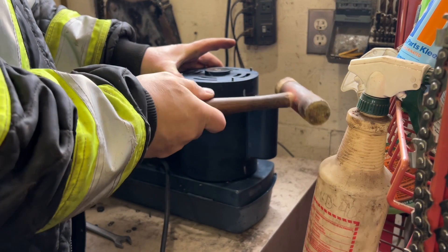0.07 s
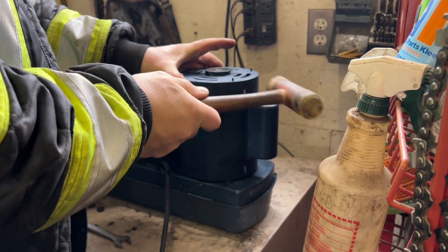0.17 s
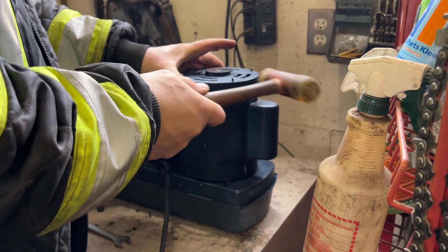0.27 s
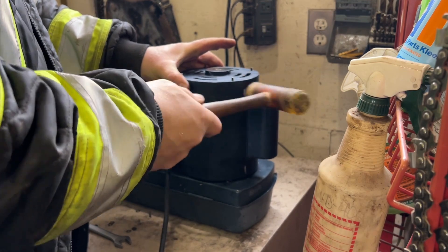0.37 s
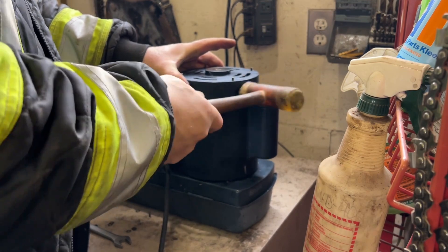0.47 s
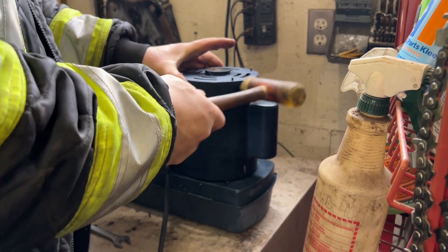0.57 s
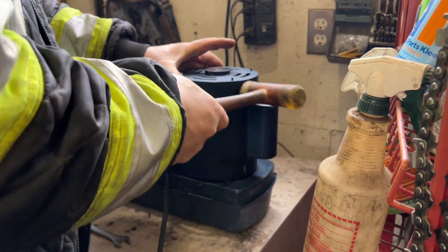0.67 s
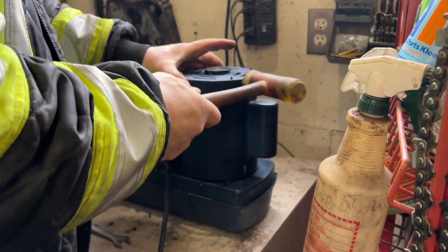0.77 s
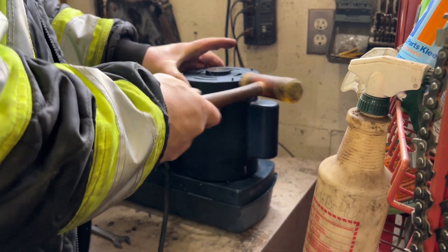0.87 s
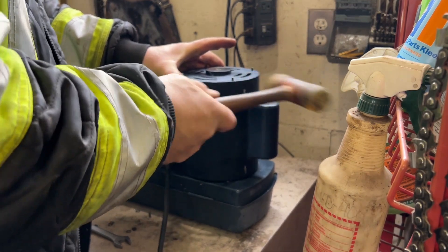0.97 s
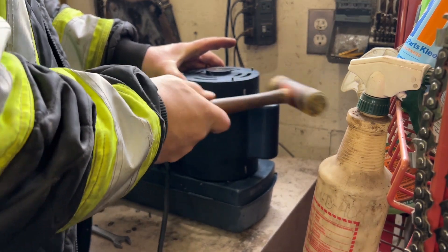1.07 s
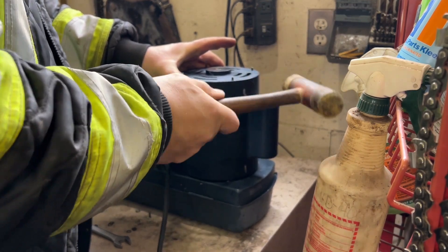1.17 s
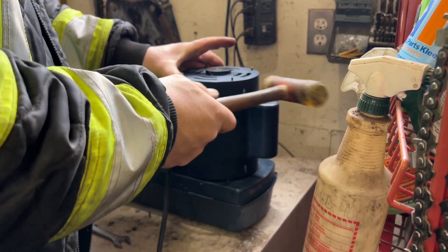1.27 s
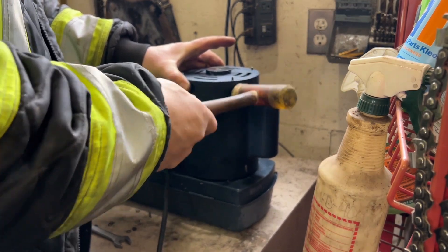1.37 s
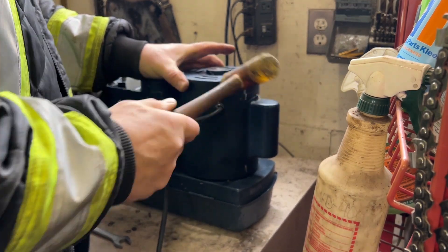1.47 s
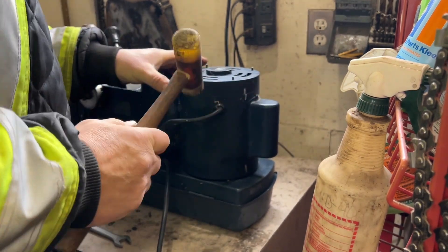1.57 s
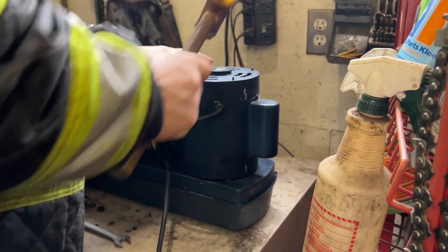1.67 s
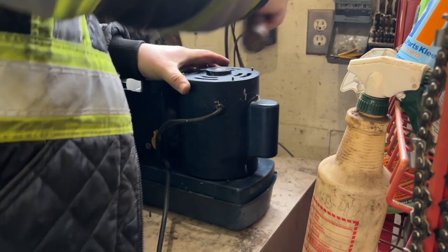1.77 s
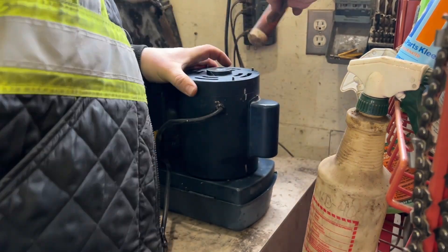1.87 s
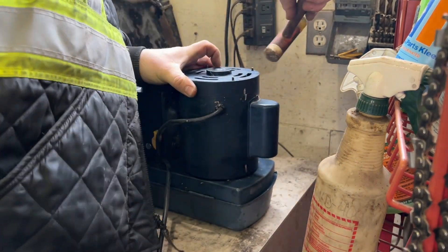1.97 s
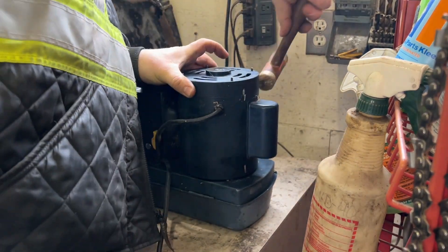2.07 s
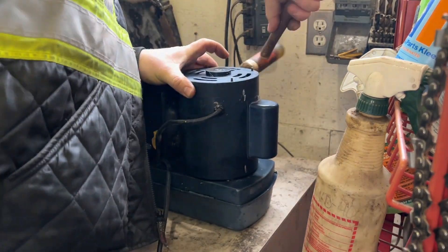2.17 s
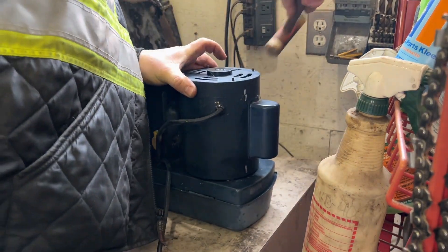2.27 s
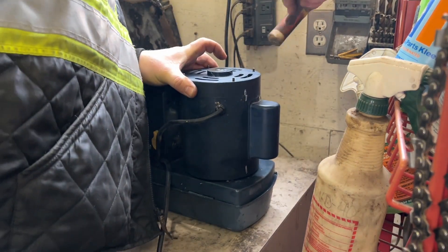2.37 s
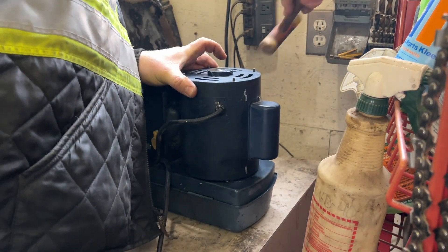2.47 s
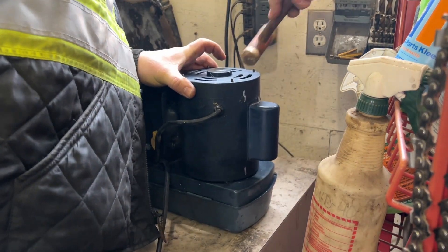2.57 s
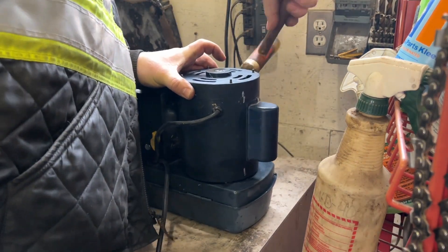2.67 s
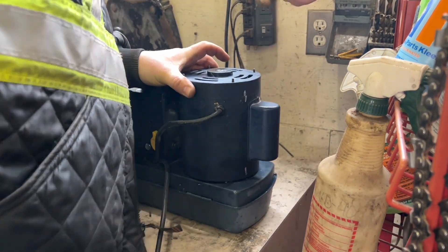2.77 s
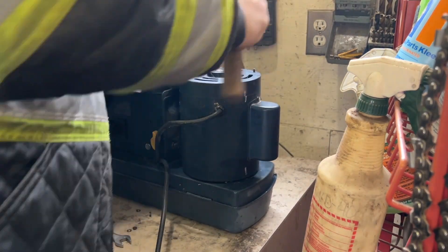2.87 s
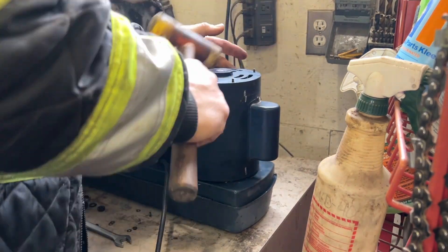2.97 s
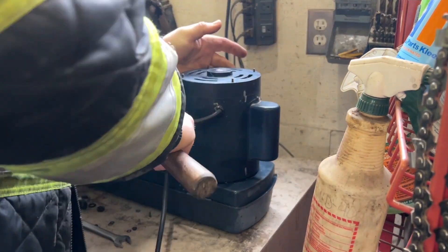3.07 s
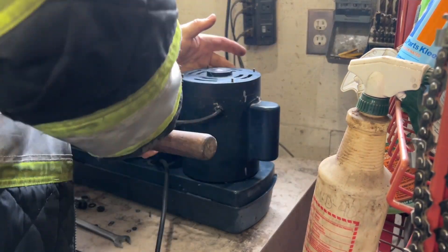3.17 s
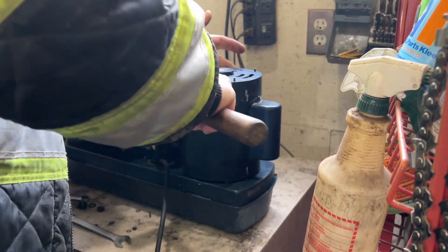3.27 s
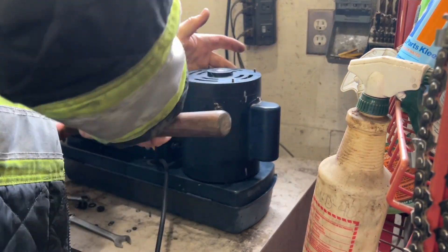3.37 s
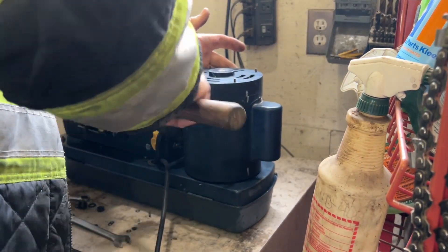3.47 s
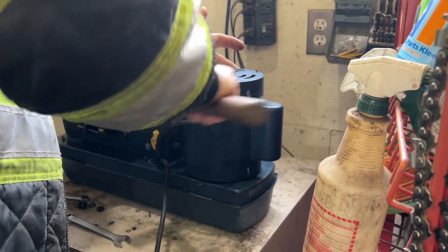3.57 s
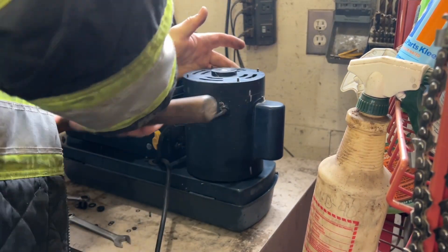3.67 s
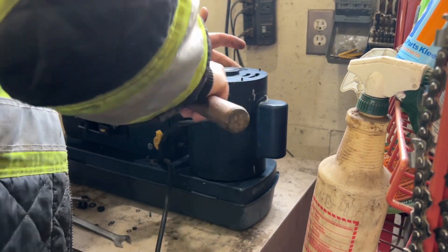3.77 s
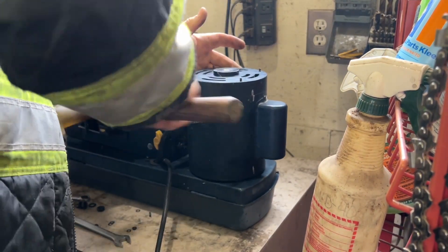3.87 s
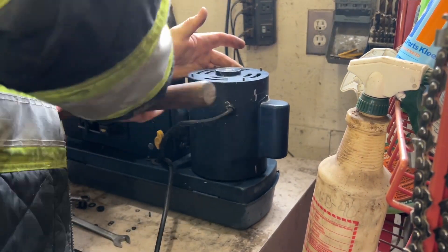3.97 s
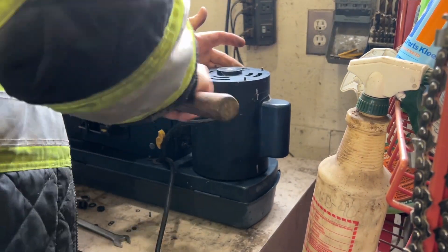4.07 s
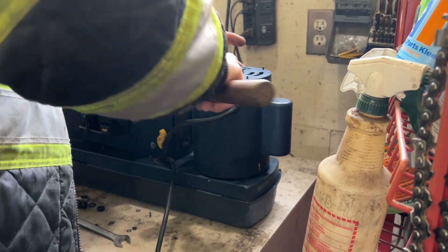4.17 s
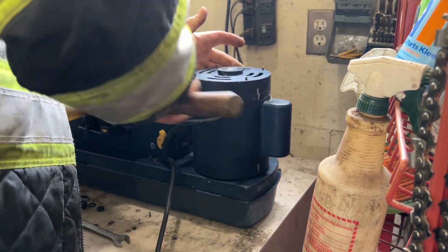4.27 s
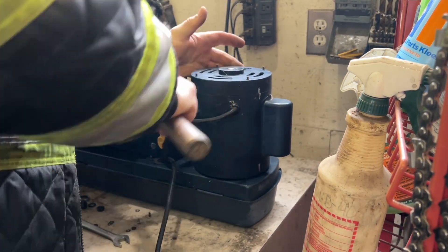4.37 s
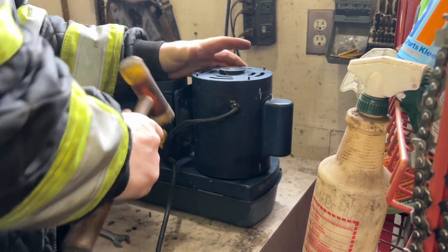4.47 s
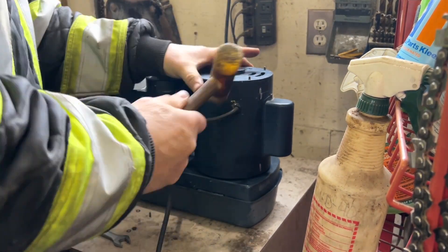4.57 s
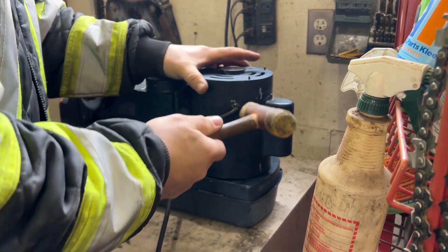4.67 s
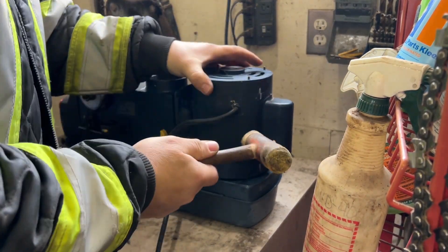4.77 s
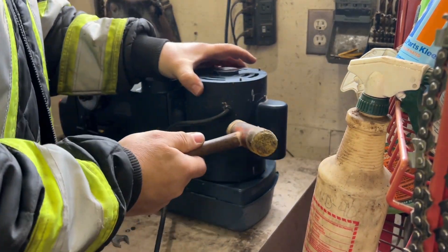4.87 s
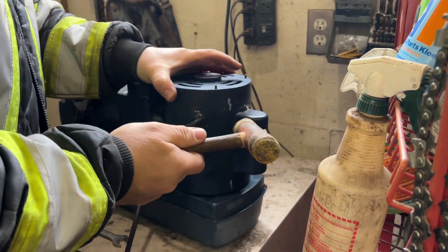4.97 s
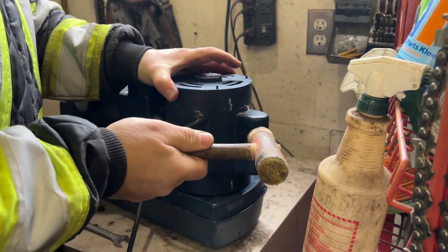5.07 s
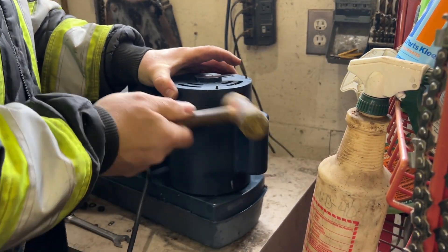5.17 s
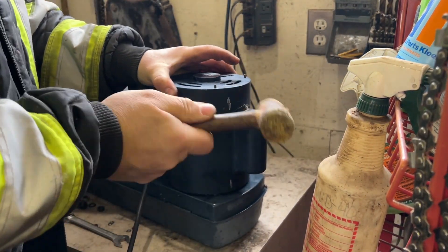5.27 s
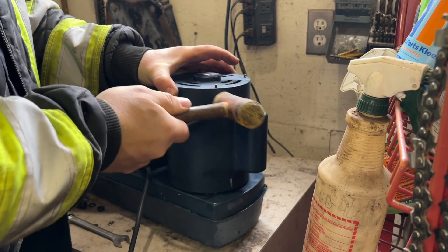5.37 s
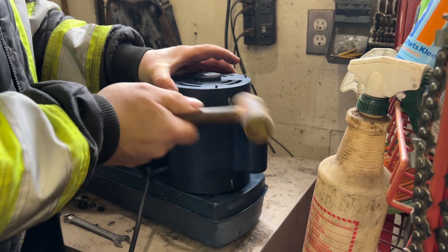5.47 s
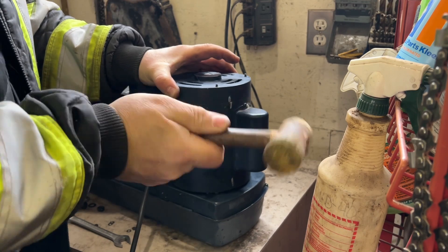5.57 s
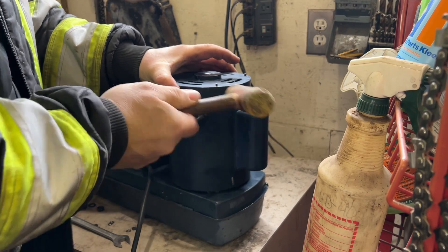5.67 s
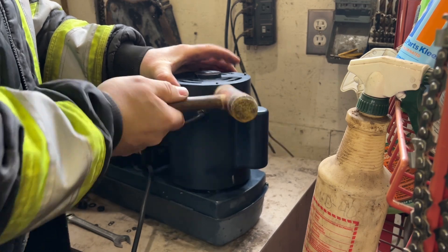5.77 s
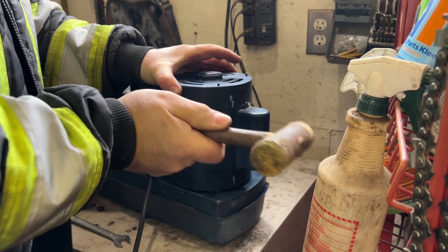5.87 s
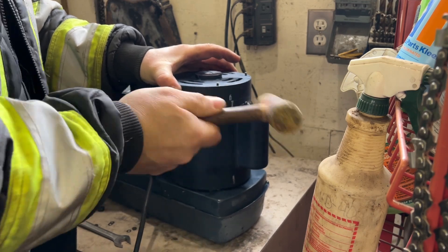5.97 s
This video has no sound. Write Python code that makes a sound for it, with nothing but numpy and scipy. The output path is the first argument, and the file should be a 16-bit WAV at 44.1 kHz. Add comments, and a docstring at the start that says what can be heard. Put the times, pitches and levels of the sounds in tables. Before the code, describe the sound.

Four runs of loud, dry mallet blows on a metal motor casing, recorded close on a workbench in a small, briefly reverberant room. The first run is fastest, the second quieter and clickier, the third and fourth slower and forceful. Loose parts tick and a cover chatters among the blows. In the gaps, a thin beating metallic tone fades, a jacket rustles, and the motor's base grates shortly over its tray. Very quiet room air lies beneath.

```python
"""A workshop bench in a small shop: a mallet taps a steel motor housing in four runs, each at a new spot.
A blow is a noise crack, decaying sine modes of casing and bench, dense noise clatter and the shop's answer.
A faint beating pair of modes sings on in the pauses; loose parts tick as short rings and clicks, a cover
chatters, grainy noise makes a jacket rustle and the motor's base drag on its tray, over quiet shop air."""
import sys
import numpy as np
from scipy import signal
from scipy.fft import rfft, irfft, next_fast_len
from scipy.io import wavfile
from scipy.ndimage import uniform_filter1d

SR = 44100
rng = np.random.default_rng(int(sys.argv[2]) if len(sys.argv) > 2 else 0)


def convert_level_to_amplitude(level_db):
    """Map a level in decibels to its linear amplitude factor."""
    exponent = np.asarray(level_db, float) / 20
    return 10 ** exponent


def wav_out(sig):
    """Save sig, one row per channel (or a flat mono array), as 16-bit PCM at SR to the path in sys.argv[1]."""
    wavfile.write(sys.argv[1], SR, np.round(np.clip(np.atleast_2d(sig).T, -1, 1) * 32767).astype(np.int16))


N = 266055  # length [samples]

# Mallet blows: (time [s], level [dB], casing boost [dB], crack boost [dB], long tone left behind [dB])
MALLET_BLOWS = [(0.0089, -2.5, 1, -0.5, -26.5), (0.1189, -2, 3.5, -3.5, -34.5),
                (0.2285, -3.5, 1.5, 1.5, -34.5), (0.3431, -2.5, 2.5, -3.5, -34.5),
                (0.4528, -3.5, 0, 0, -41.5), (0.5559, -2.5, 1.5, -2.5, -44.5),
                (0.6666, -5, 2.5, -0.5, -53.5), (0.7818, -5, 2.5, 3.5, -53.5), (0.8896, -5.5, 1.5, 3, -46),
                (0.9998, -4, 1, 3.5, -58), (1.1029, -2, -0.5, -4, -37), (1.2184, -2.5, -2, 0.5, -50),
                (1.339, -3, 1.5, 1, -45), (2.0596, -10, 0.5, 3.5, -61), (2.1878, -10, 1, 9.5, -44.5),
                (2.3099, -9, 3.5, 6, -44), (2.4278, -8, 4.5, 5.5, -46.5), (2.5447, -9, 6, 4, -42.5),
                (2.6627, -8.5, 4.5, 1, -44.5), (3.2787, -2.5, 1, 2, -39), (3.4349, -2.5, 0.5, -2, -37.5),
                (3.5883, -3, -1.5, -7.5, -45), (3.754, -2, -2, -4, -43), (3.908, -2, 2, 0.5, -34),
                (4.0457, -3.5, 0.5, -3, -44), (4.1795, -4, 0.5, -4.5, -47.5), (4.3076, -3.5, 2.5, -1, -42),
                (5.1997, -7, 4, 5.5, -58), (5.355, -3.5, 0, 1.5, -54), (5.501, -2.5, -3.5, -5, -48.5),
                (5.6467, -2.5, -2.5, -4.5, -49.5), (5.786, -3.5, -2.5, -5.5, -56),
                (5.9247, -3, -2, -3.5, -44)]


def unit(x):
    """Scales to rms 1."""
    return x / np.sqrt(np.mean(x ** 2) + 1e-20)


def along(points, hz):
    """Reads a curve of (frequency [Hz], value) points on a log frequency axis."""
    f, value = np.transpose(points)
    return np.interp(np.log(hz + 1), np.log(f + 1), value)


def level(rows):
    """Gain per sample from (time [s], level [dB]) rows, practically silent outside them."""
    s, db = np.transpose(rows)
    return convert_level_to_amplitude(np.interp(np.arange(N) / SR, s, db, left=-150, right=-150))


def filtered(x, response):
    """Multiplies the spectrum of x by a complex response of frequency."""
    size = next_fast_len(x.shape[-1] + 8192)  # padding gives the filter's tail room
    spectrum = rfft(x, size) * response(np.fft.rfftfreq(size, 1 / SR))
    return irfft(spectrum, size)[..., :x.shape[-1]]


def stereo(pair, spectrum, wide):
    """Colours two unrelated signals and mixes them to left and right; wide scales their unlikeness."""
    # How alike left and right are before widening: (frequency [Hz], likeness [0-1])
    likeness = [(60, 1), (180, 0.98), (550, 0.9), (1650, 0.41), (4970, 0.5), (15000, 0.61)]

    def mid_and_side(hz):
        turn = wide * np.arccos(np.clip(along(likeness, hz), -1, 1)) / 2
        return convert_level_to_amplitude(along(spectrum, hz)) * np.array([np.cos(turn), np.sin(turn)])[:, None]

    mid, side = filtered(pair, mid_and_side)
    return np.array([mid + side, mid - side])


def alike_noise(spot, size, same):
    """Two noise rows per blow; blows at one spot have the share `same` of their noise power in common."""
    same = np.clip(same, 0, 1)
    shared = rng.standard_normal((2, spot.max() + 1, size))[:, spot]
    own = rng.standard_normal((2, len(spot), size))
    return np.sqrt(same) * shared + np.sqrt(1 - same) * own


def dying(noise, t60, rise_cycles):
    """Each octave band builds up over a few of its cycles, then dies at its own speed."""
    t = np.arange(noise.shape[-1]) / SR
    edges = 45 * 2.0 ** np.arange(10)
    out = 0
    for lo, hi in zip(edges, edges[1:]):
        mid_hz = np.sqrt(lo * hi)
        band = filtered(noise, lambda hz: (hz >= lo) & (hz < hi))
        fade = convert_level_to_amplitude(-60 * t / along(t60, mid_hz))
        rise = (1 - np.exp(-t * mid_hz / rise_cycles)) ** 2
        out = out + band * fade * rise
    return out


def struck_spot(s):
    """A pause over 0.3 s means the mallet has moved on to the next spot."""
    return np.cumsum(np.diff(s, prepend=0) > 0.3)


def shop_air():
    """The shop's steady background: coloured stereo noise."""
    # Colour of the background: (frequency [Hz], relative density [dB])
    air_colour = [(30, -31), (70, -5), (130, -2.5), (300, -17.5), (600, -9), (1200, -18), (3000, -21.5),
                  (16000, -33)]
    return convert_level_to_amplitude(-64) * unit(stereo(rng.standard_normal((2, 1, N)), air_colour, wide=0.53)[:, 0])


def jacket():
    """Quilted cloth rustles in uneven grains as the arms move; each rustle swells and sinks."""
    # Rustles: (peak time [s], relative level [dB], rise over 20 dB [s], fall over 20 dB [s])
    rustles = [(1.54, -74.5, .2, 0.067), (1.655, -59, 0.13, .09), (1.84, -71.5, .25, .25),
               (2.8, -73.5, 0.14, .35), (3.045, -60, .14, .1), (4.535, -57.5, 0.088, .08),
               (4.955, -53, .12, 0.081), (5.145, -61.5, 0.02, .04)]
    # Colour of the cloth: (frequency [Hz], relative density [dB])
    cloth_colour = [(150, -7), (500, 0), (1000, -0.5), (2000, -5), (3500, -7.5), (5000, -6), (8000, -5),
                    (12000, -5.5), (16000, -16.5)]
    t = np.arange(N) / SR
    grain_db = 2.5 * unit(uniform_filter1d(rng.standard_normal(N), size=60))
    grains = rng.standard_normal((2, 1, N)) * convert_level_to_amplitude(grain_db)
    swell = 0
    for s, db, rise, fall in rustles:
        distance = np.abs((t - s) / np.where(t < s, rise, fall))
        swell = swell + convert_level_to_amplitude(db - 20 * distance ** 1.15)
    return convert_level_to_amplitude(6.5) * swell * unit(stereo(grains, cloth_colour, wide=1.2)[:, 0])


def drag():
    """The motor's base slides in rough slips that sound through the tray's resonances."""
    # Loudness of the slide: (time [s], level [dB])
    slide_level = [(4.82, -83), (4.866, -53), (4.97, -38), (5.014, -49), (5.048, -61), (5.054, -52),
                   (5.1, -63.5)]
    # Tray resonances: (frequency [Hz], width [Hz], relative level [dB])
    tray_modes = [(570, 38, 0), (970, 160, -6.5), (1180, 48, -9), (1790, 70, -11)]
    broad_colour = [(100, -18.5), (300, -13), (800, -15.5), (1500, -17.5), (3000, -29), (8000, -45)]  # Hz, dB
    slip_db = 5.9 * unit(uniform_filter1d(rng.standard_normal(N), size=200))
    slips = rng.standard_normal(N) * convert_level_to_amplitude(slip_db)

    def tray(f):
        response = convert_level_to_amplitude(along(broad_colour, f))
        for k, (hz, width, db) in enumerate(tray_modes):
            resonance = 1j * f * width / (hz * hz - f * f + 1j * f * width)
            response = response + (-1) ** k * convert_level_to_amplitude(db) * resonance  # neighbours in opposite polarity
        return response

    return level(slide_level) * unit(filtered(slips, tray))


def ticks():
    """Loose parts tick: a short noise click and a mix of the small modes nearest to each tick's colour."""
    # Ticks: (time [s], level [dB], centre of the colour [Hz], share of the modes' t60 [ratio])
    tick_rows = [(1.603, -53, 2690, 1), (1.721, -52, 2930, 1.1), (1.745, -46.5, 3730, 0.45),
                 (1.818, -64, 2750, 0.94), (1.917, -49, 4600, .7), (2.993, -57.5, 4600, 0.69),
                 (3.543, -38, 5500, 0.45), (3.677, -36.5, 7500, 0.34), (3.7, -30, 6800, 0.21),
                 (3.717, -38.5, 7800, 0.24), (3.839, -35.5, 7500, 0.5), (3.862, -37, 7500, .6),
                 (3.884, -41, 7500, 0.67), (4.649, -61, 4040, 0.87), (4.666, -49.5, 2050, 0.84),
                 (4.717, -63, 6050, 0.54), (4.761, -50.5, 3020, 0.71), (4.783, -64.5, 2450, 0.71),
                 (4.817, -64.5, 4000, 0.46), (4.838, -71, 5030, .4), (4.969, -40.5, 8000, 0.43),
                 (5.031, -62, 4000, 0.32), (5.141, -52.5, 3780, 1.1)]
    # Modes of the loose parts: (frequency [Hz], relative level [dB], full t60 [s])
    part_modes = [(2017, -4, 0.06), (2450, -12.5, 0.068), (2750, -6.5, 0.13), (3550, -5, 0.045),
                  (4600, 1, 0.032), (5930, -9.5, 0.045), (7500, -2.5, 0.021), (8190, -3, 0.03),
                  (10400, -1, .02)]
    out = np.zeros(N + SR)
    t = np.arange(SR // 10) / SR
    hz, mode_db, t60 = np.transpose(part_modes)[..., None]
    for s, db, centre_hz, share in tick_rows:
        off_colour_db = 11 * np.abs(np.log2(hz / centre_hz))
        strength_db = mode_db - off_colour_db + rng.normal(0, 2.1, hz.shape)
        ring = np.sum(convert_level_to_amplitude(strength_db - 60 * t / t60 / share) * np.sin(2 * np.pi * hz * t), axis=0)
        colour = lambda f: convert_level_to_amplitude(-14 * np.abs(np.log2((f + 1) / centre_hz)))
        near = unit(filtered(rng.standard_normal(len(t)), colour))
        click = 0.35 * convert_level_to_amplitude(-60 * t / 0.052 / share) * near
        out[round(s * SR):][:len(t)] += convert_level_to_amplitude(db) * (ring + click)
    return out[:N]


def cover():
    """A loose cover chatters in soft short knocks, each sounding its close modes in a new mix."""
    # Knocks: (time [s], level [dB])
    knocks = [(0.029, -19), (2.689, -23.5), (2.70, -36), (3.464, -21), (3.495, -34), (3.518, -40),
              (3.538, -41), (3.672, -33), (3.697, -39), (3.806, -37), (3.842, -37), (3.86, -39),
              (3.882, -41), (3.934, -20), (3.955, -24), (4.336, -21), (4.36, -37)]
    # The cover's close modes: frequency [Hz]
    cover_modes = [982, 1054, 1100]
    out = np.zeros(N + SR)
    t = np.arange(SR // 10) / SR
    for s, db in knocks:
        ring = 0
        for hz in cover_modes:
            phase = rng.uniform(0, 2 * np.pi)
            ring = ring + convert_level_to_amplitude(rng.normal(-2, 3)) * np.sin(2 * np.pi * hz * t + phase)
        envelope = convert_level_to_amplitude(db - 60 * t / 0.043) * (1 - np.exp(-t / 0.002))
        out[round(s * SR):][:len(t)] += envelope * ring
    return out[:N]


def singing(blows):
    """Each blow leaves the pair at a new strength; it is damped while the blow is loud, then beats and fades."""
    # Pair at each spot: (frequency [Hz], partner's offset [Hz], partner [dB], first dip after the blow [s])
    pair_by_spot = [(696, -7.5, -2, -.005), (679, 7, -0.5, 0.072), (666, 5.5, -2, 0.11),
                    (680, 8.5, -3, .05)]
    t60 = 1.83  # s
    s, sing_db = np.transpose(MALLET_BLOWS)[[0, 4]]
    t = np.arange(N) / SR
    last = np.maximum(np.searchsorted(s, t) - 1, 0)  # the latest blow at each sample
    since = t - s[last]
    hz, offset_hz, partner_db, dip_s = np.transpose(pair_by_spot)[:, struck_spot(s)[last]]
    pair = 1 - convert_level_to_amplitude(partner_db) * np.exp(2j * np.pi * offset_hz * (since - dip_s))
    for neighbour_db, neighbour_hz in [(-13.5, 13.5), (-11, 26.5)]:  # fainter neighbours roughen it
        pair = pair + convert_level_to_amplitude(neighbour_db) * np.exp(2j * np.pi * neighbour_hz * t)
    wander = np.cumsum(rng.normal(0, 0.003, N))  # slow phase drift
    tone = (pair * np.exp(2j * np.pi * hz * t + 1j * wander)).imag
    loud = np.abs(uniform_filter1d(blows[0] ** 2, size=900, origin=440))
    damping = 1 + loud / convert_level_to_amplitude(-75.5)
    return convert_level_to_amplitude(sing_db[last] - 60 * since / t60) * tone / damping


def mallet():
    """Every blow cracks, excites the casing and bench modes and dense clatter, and the shop answers."""
    # Motor and bench modes: (frequency [Hz], t60 [s], relative level struck at spot 1, 2, 3, 4 [dB])
    modes_by_spot = [(113, 0.16, -35, -36.5, -45, -43), (142.8, 0.3, -35, -31.5, -31.5, -33.5),
                     (223, 0.13, -34.5, -31.5, -23.5, -37), (300.6, 0.24, -40.5, -51, -36, -37.5),
                     (378.5, .15, -34.5, -42, -29, -34.5), (517.5, 0.071, -28, -22.5, -39, -29),
                     (576, 0.098, -22, -21, -30, -23), (651, 0.098, -25, -19.5, -32.5, -29.5),
                     (719, 0.076, -20.5, -42.5, -29.5, -25), (871, 0.084, -34, -41, -33, -29.5),
                     (841, 0.45, -61.5, -45.5, -60, -63), (1000, 0.07, -27, -34.5, -35.5, -27),
                     (1086, 0.033, -21, -14, -29.5, -26), (1448, 0.038, -27, -50, -34, -22),
                     (1820, 0.014, -54.5, -6.5, -25, -31), (2100, 0.13, -32, -31, -43, -36),
                     (2450, 0.049, -46.5, -16.5, -23, -27), (2727, 0.061, -22.5, -33.5, -26.5, -25),
                     (3050, 0.017, -36.5, -43.5, -39.5, -45), (3100, 0.3, -45, -44.5, -42, -41),
                     (3615, 0.047, -20, -32, -24.5, -32), (4254, 0.038, -19, -14, -34.5, -21.5),
                     (4716, 0.04, -26.5, -35, -22.5, -21), (5500, 0.008, -29, -25.5, -10, -25),
                     (6240, 0.022, -21.5, -18.5, -25.5, -16), (7500, 0.0083, -16.5, -19, -44.5, -37.5),
                     (9680, 0.034, -36.5, -18.5, -34.5, -37.5), (12380, 0.016, -25, -13, -18, -21.5)]
    # Colour of the crack: (frequency [Hz], relative density [dB])
    crack_colour = [(300, -36.5), (1000, -1), (2500, -5.5), (5000, 0), (8000, -5), (12000, -14.5),
                    (16000, -13)]
    # Colour of the dense ringing: (frequency [Hz], relative density [dB])
    clatter_colour = [(35, -30), (60, -8.5), (172, -5), (882, -5), (1040, -5), (1510, -10), (2650, -4),
                      (4640, -7.5), (9570, -9.5), (14900, -20.5), (16000, -20)]
    # Decay of the dense ringing, then of the shop: (frequency [Hz], t60 [s])
    clatter_t60 = [(100, 0.28), (500, 0.11), (2000, 0.12), (6000, 0.037), (14000, 0.097)]
    shop_t60 = [(100, 0.3), (500, 0.27), (2000, 0.27), (6000, 0.23), (14000, 0.25)]
    # Bench back and near walls: (delay [s], level ahead of the treble loss [dB])
    echoes = [(.008, -14.5), (.019, -16), (.03, -19)]
    # The four spots: (bench thud over casing [dB], brightness [dB])
    spot_colour = [(-4, 2.5), (-1.3, 2), (-1.7, -2), (-1.2, -0.1)]

    s, db, casing_db, crack_db, _ = np.transpose(MALLET_BLOWS)
    spot = struck_spot(s)
    thud_db, bright_db = np.transpose(spot_colour)[:, spot]
    thud_db = thud_db + casing_db
    size = SR // 3
    t = np.arange(size) / SR

    same = 0.55  # share of noise power that blows at one spot have in common
    burst = (1 - np.exp(-t / 0.00033)) * convert_level_to_amplitude(-60 * t / 0.0094)
    crack_noise = unit(stereo(alike_noise(spot, size, same), crack_colour, wide=0.35))
    crack = convert_level_to_amplitude(crack_db + 0.5)[:, None] * burst * crack_noise
    dense = unit(stereo(alike_noise(spot, size, same), clatter_colour, wide=1.34))
    clatter = convert_level_to_amplitude(-12.5) * dying(dense, clatter_t60, rise_cycles=1.6)
    far = unit(stereo(alike_noise(spot, size, same), clatter_colour, wide=1.286))
    shop = convert_level_to_amplitude(-21) * dying(far, shop_t60, rise_cycles=2.6)

    hz, t60, *strength = np.transpose(modes_by_spot)
    spot_phase = rng.uniform(0, 2 * np.pi, (4, len(hz)))[spot]
    phase = spot_phase + rng.normal(0, 0.13, (len(s), len(hz)))
    strength_db = np.array(strength)[spot] + 3 + rng.normal(0, 1.8, phase.shape)
    gain = convert_level_to_amplitude(strength_db) * np.exp(1j * phase)
    rise = (1 - np.exp(-np.outer(hz, t) / 1.11)) ** 2  # low modes take longer to get going
    fade = convert_level_to_amplitude(-60 * t / t60[:, None])
    ring = (gain @ (rise * fade * np.exp(2j * np.pi * np.outer(hz, t)))).imag

    def tilt(f):
        """Thud, casing and brightness of each blow."""
        curves = [[(300, thud), (500, casing), (1300, casing), (2200, 0), (7000, 0), (10000, bright)]
                  for thud, casing, bright in zip(thud_db, casing_db, bright_db)]
        return convert_level_to_amplitude([along(curve, f) for curve in curves])

    def walls(f):
        """Direct sound and its echoes, which lose treble above 1500 Hz."""
        returns = sum(convert_level_to_amplitude(echo_db) * np.exp(-2j * np.pi * f * delay) for delay, echo_db in echoes)
        return 1 + returns / (1 + 1j * f / 1500)

    def lean(f):
        """A little to the left, most in the treble."""
        side_db = along([(200, 0.062), (500, 0.45), (5000, 0.96), (9000, 1.6)], f)
        return convert_level_to_amplitude(side_db * np.array([1, -1])[:, None, None])

    blows = filtered(crack + clatter + shop + ring, lambda f: tilt(f) * walls(f)) * convert_level_to_amplitude(db)[:, None]
    blows = filtered(blows, lean)
    out = np.zeros((2, N + size))
    starts = np.round((s + 0.0026) * SR).astype(int)  # sound starts 2.6 ms after the listed time
    for k, start in enumerate(starts):
        out[:, start:start + size] += blows[:, k]
    return out[:, :N]


def scene():
    """Everything on the bench, over the shop's quiet air."""
    blows = mallet()
    small = singing(blows) + drag() + ticks() + cover()
    small = small * convert_level_to_amplitude([[0.4], [-0.4]])  # a little to the left
    return blows + small + jacket() + shop_air()


def suppress(x, knee_db, most_db):
    """Noise suppressor: frequency regions that fall near the knee are turned down, by at most most_db."""
    z = signal.stft(x, nperseg=512)[2]
    power = np.mean(np.abs(z) ** 2, axis=0)
    power = uniform_filter1d(power, size=15, axis=0)  # over frequency
    power = np.abs(uniform_filter1d(power, size=3, axis=1))  # over time
    cut_db = most_db / (1 + power / convert_level_to_amplitude(2 * knee_db))
    return signal.istft(z * convert_level_to_amplitude(-cut_db), nperseg=512)[1][:, :N]


def roll_off(x):
    """The treble ends steeply here."""
    return signal.sosfilt(signal.butter(12, 16990, fs=SR, output="sos"), x)


def record(dry):
    """The microphone drops the deep bass; the camera suppresses quiet sound, clips softly and cuts the top."""
    x = filtered(dry, lambda hz: (1j * hz / (75 + 1j * hz)) ** 2)
    x = suppress(x, knee_db=-82.5, most_db=6)
    ceiling = 0.92  # full scale = 1
    x = x / (1 + np.abs(x / ceiling) ** 5) ** (1 / 5)
    top_cut = [(15800, 0), (15950, -16), (16800, -22), (17100, -90)]  # Hz, dB
    x = filtered(x, lambda hz: convert_level_to_amplitude(along(top_cut, hz)))
    return roll_off(x)


dry = scene()
out = record(dry)
wav_out(out)
```